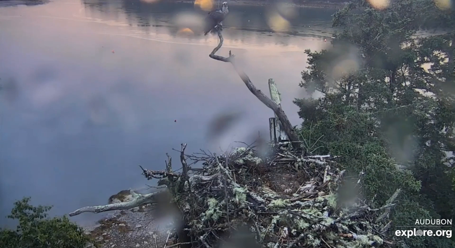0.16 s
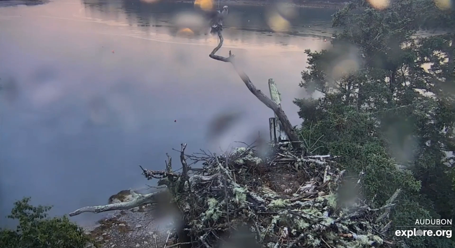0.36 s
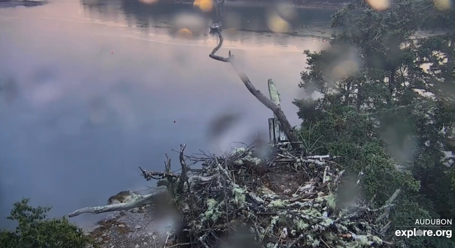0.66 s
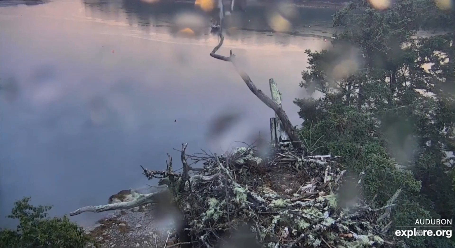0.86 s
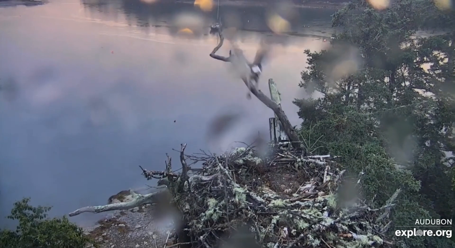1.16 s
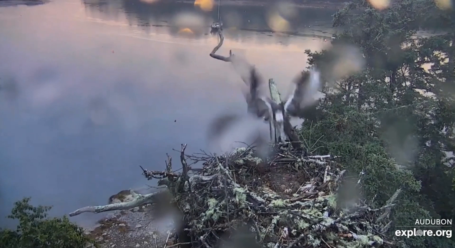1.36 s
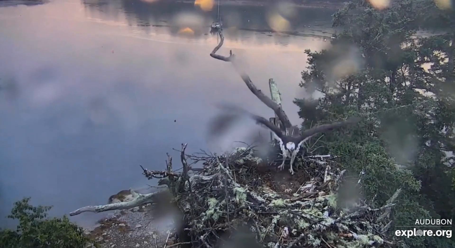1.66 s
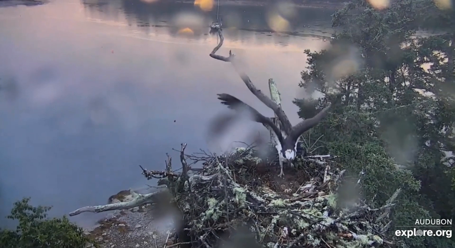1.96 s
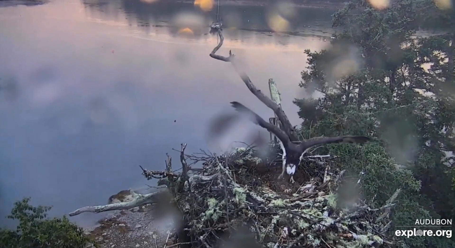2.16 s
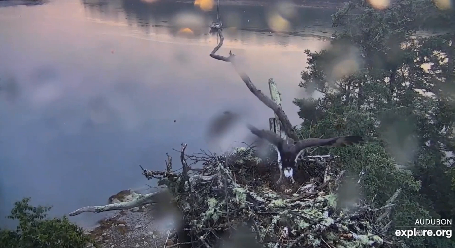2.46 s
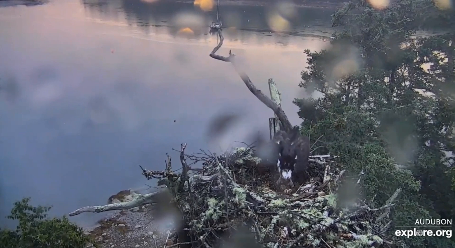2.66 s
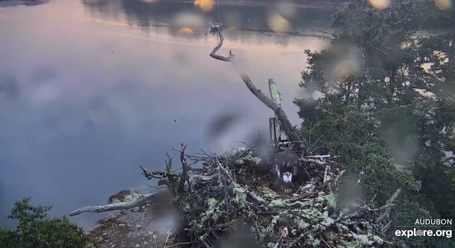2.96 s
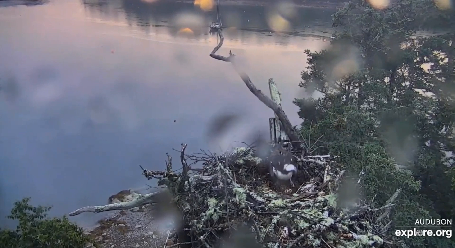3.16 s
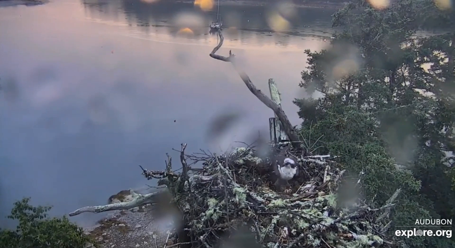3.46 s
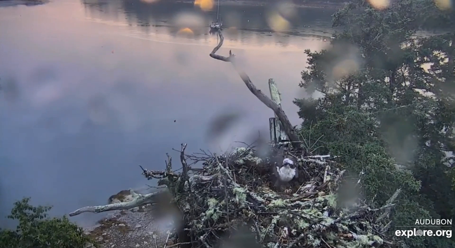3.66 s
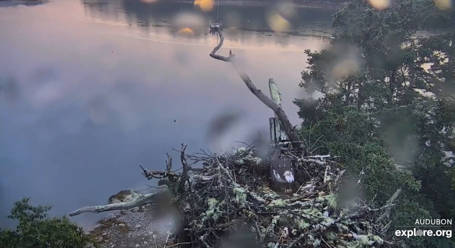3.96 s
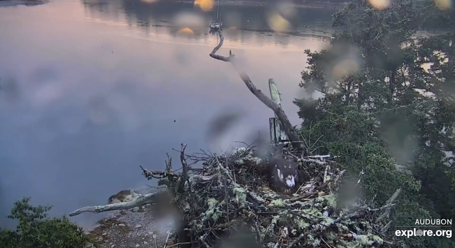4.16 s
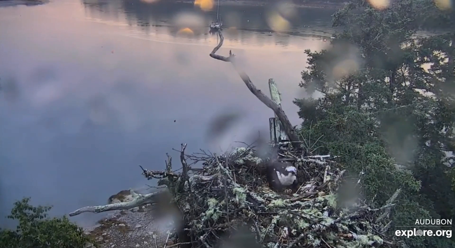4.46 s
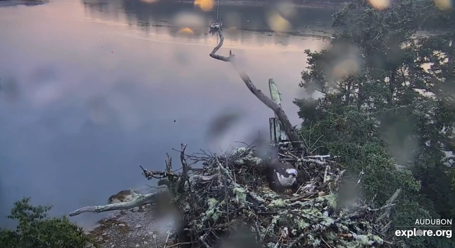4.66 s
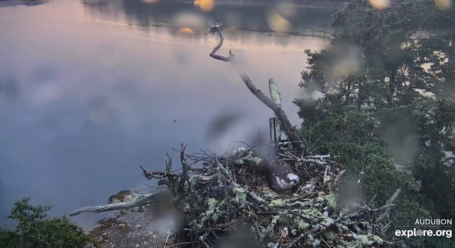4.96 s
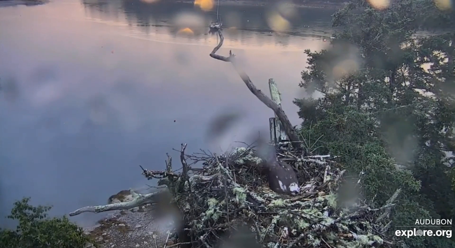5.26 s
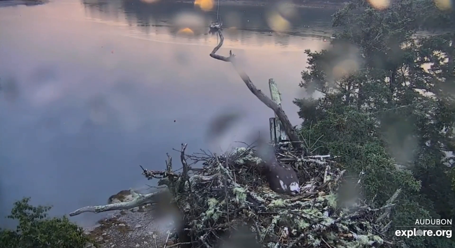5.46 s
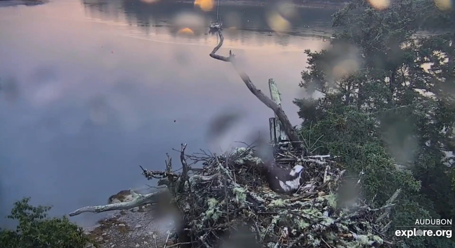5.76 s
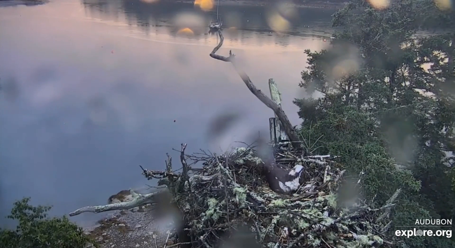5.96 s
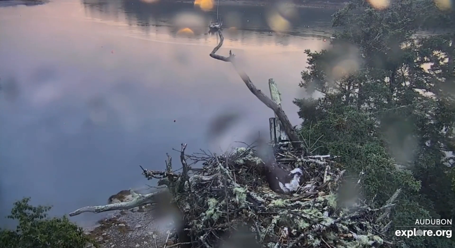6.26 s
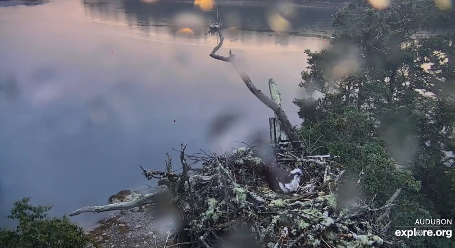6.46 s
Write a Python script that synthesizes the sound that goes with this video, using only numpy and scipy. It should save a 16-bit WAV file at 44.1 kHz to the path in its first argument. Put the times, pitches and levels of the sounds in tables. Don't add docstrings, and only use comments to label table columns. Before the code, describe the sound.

Seven tiny arched bird whistles, each a mere blip, sound over a quiet lakeside hiss with soft watery murmur. Between the second and third, feathers flutter quickly and a cluster of brittle twig cracks marks the landing. Later calls come further apart, the fifth loudest, with soft hollow drips and light leaf ticks between. The single microphone is a few metres from the nest, in open air with slight scattered tree echo and a blurred distant return.

```python
import sys
import numpy as np
from scipy import signal
from scipy.fft import rfft, irfft, next_fast_len
from scipy.io import wavfile
from scipy.ndimage import uniform_filter1d

SR = 44100
rng = np.random.default_rng(int(sys.argv[2]) if len(sys.argv) > 2 else 0)


def volts(x):
    e = np.asarray(x, float) / 20
    return 10 ** e


def int16_out(signal):
    q = np.round(np.clip(np.atleast_2d(signal).T, -1, 1) * 32767)
    wavfile.write(sys.argv[1], SR, q.astype(np.int16))


N = 291937

# frequency in Hz, level in dB per Hz.
AIR_SPECTRUM = [(20, -30.5), (32, -0.5), (48, -27), (62, -1), (120, -2.5), (200, -8), (700, -12.5),
                (1300, -10.5), (1800, -8), (2500, -20.5), (4000, -21.5), (8000, -28), (12000, -32.5),
                (15600, -33)]
AIR_DB = -66
# frequency in Hz, rms level in dB.
WHINES = [
    (15734, -93),
    (11234, -108),
    (33, -87),
]
# time in seconds, level in dB.
LAPPING = [(0.0, -61.5), (0.15, -64.5), (0.33, -67.5), (1.14, -62), (1.56, -62.5), (2.06, -66.5),
           (2.73, -63.5), (2.93, -65), (3.26, -68.5), (3.65, -66), (3.82, -63), (4.04, -66.5),
           (4.74, -65.5), (5.33, -69.5), (5.83, -63), (5.96, -67), (6.27, -63), (6.62, -70.5)]
# frequency in Hz, width in Hz, level in dB.
HOUSING = [
    (1832, 460, 0.5),
    (1605, 580, 2),
    (1200, 55, 2),
    (2264, 750, -12),
]
# start in seconds, peak in dB, pitch in Hz, 60 dB decay in seconds.
TICKS = [(0.0197, -55, 2580, 0.02), (0.3122, -56, 2690, 0.018), (3.1437, -54, 2700, 0.02),
         (3.2001, -57, 2920, 0.017), (3.7434, -58, 2357, 0.021), (4.0881, -57, 2350, 0.025),
         (5.032, -55, 2640, 0.021), (5.096, -54, 2680, 0.02)]
# start in seconds, length in seconds, peak in dB, top pitch in Hz,
# faint falling end in dB relative to the peak.
WHISTLES = [
    (0.113, 0.043, -32.5, 1963, -21.5),
    (0.893, 0.015, -37.5, 1884, -9),
    (1.534, .040, -33.5, 1962, -41),
    (2.071, 0.053, -39.5, 1994, -38),
    (3.332, 0.042, -26.5, 2018, -44),
    (4.464, 0.045, -31.5, 1942, -40),
    (5.863, 0.046, -28, 1960, -30),
]
# crest as a share of length, start and end in dB relative to the crest.
EFFORTS = [(.47, -18, -15), (.58, -29, -11), (.6, -12.5, -7.5), (.44, -16, -11), (.5, -17, -10),
           (.62, -15, -14), (.66, -15, -11.5)]
# top as a share of length, climb in % per ms, slide in % per ms,
# rounding of the top in ms.
ARCHES = [(.43, .65, .48, 8), (.5, 0.75, 0.6, 2.5), (0.33, 1, 0.69, 2.4), (0.323, 0.94, 0.62, 3.3),
          (.33, 0.86, 0.95, 13.3), (0.554, 0.54, 0.62, 2.6), (0.627, .31, 0.54, 8)]
# octave, third and fourth in dB relative to the fundamental,
# fifth in dB relative to the fourth.
PARTIALS = [(-25, -54, -42.5, -12), (-14.5, -44, -26.5, -11.5), (-11.5, -36, -25.5, -13),
            (-11, -32, -29, -22), (-15, -40, -32, -18), (-15, -39, -34.5, -12), (-26, -46.5, -45.5, -11.5)]
# trunk echo delay in seconds,
# trunk echo in dB, leaf scatter in dB.
POSTURE = [(0.0268, -20, 2), (0.02, -20, 3), (0.022, -16.5, 2), (.017, -13, -11), (0.028, -27, -9),
           (0.011, -19, -6), (.024, -31.5, -5.5)]
# time in seconds, depth in dB,
# width in seconds.
CATCHES = [(3.3645, -34, 0.0027), (.1205, -3.5, 0.0026), (.147, -8, 0.0027), (.909, -6, 0.0015),
           (2.082, -7, 0.0017), (4.481, -5, 0.0019)]
# frequency in Hz, gain in dB.
ECHO_TONE = [(1000, -25), (1600, -13), (1850, -5), (1990, 1), (2300, 0), (3500, -6), (4050, 1), (6000, -8),
             (10000, -25)]
# delay in seconds, level in dB.
LEAVES = [(.004, -34.5), (.012, -24.5), (.035, -21.5), (.07, -30.5), (.13, -34), (.2, -46.5)]
# delay in seconds, level in dB.
SHORE = [(.2, -66), (.3, -37), (.45, -39), (.62, -48), (.8, -74)]
# start in seconds, peak in dB, pitch in Hz.
DRIPS = [(0.3445, -60, 1200), (0.495, -55, 1154), (1.6646, -58, 1200), (1.743, -52.5, 1190),
         (2.4167, -48, 1160), (3.67, -59, 1110), (3.9499, -47.5, 1186), (4.2867, -62, 1150),
         (5.032, -56, 1080)]
# start in seconds, peak in dB, pitch in Hz.
KNOCK = (.7255, -48, 1600)
# centre in seconds, level in dB, half length in seconds,
# frequency in Hz, width in Hz.
BUMPS = [
    (0.439, -70, 0.029, 230, 117),
    (0.483, -59.5, 0.03, 300, 248),
    (0.57, -66.5, 0.018, 208, 100),
    (2.329, -65, 0.0094, 430, 150),
    (6.188, -68.5, 0.016, 2570, 350),
]
# centre in seconds, level in dB, half length in seconds.
WINGS = [(0.94, -72, 0.026), (1.011, -60.5, 0.018), (1.135, -56.5, 0.02), (1.235, -58, 0.0096),
         (1.26, -59, 0.014), (1.31, -64, 0.013), (1.361, -56.5, 0.021), (1.42, -69, 0.013),
         (2.43, -59.5, 0.0034)]
# frequency in Hz, level in dB per Hz.
FEATHERS = [(180, -51), (300, -22), (384, -12.5), (1380, -4.5), (1640, 3), (2520, -13.5), (4540, -16),
            (5810, -29), (7440, -17), (12000, -40), (15600, -73), (22000, -120)]
# start in seconds, peak in dB, burst length in seconds, tilt in dB per octave.
SNAPS = [(1.253, -45, .002, -1), (1.3447, -32, .005, 3), (1.349, -39, .003, 2), (1.357, -46, .002, 3),
         (1.3605, -33, .0035, -1), (1.370, -50, .005, .5), (1.380, -50, .003, 3), (1.384, -37.5, .002, -4),
         (1.386, -42, .002, -5), (5.2655, -52, .001, 0)]
# frequency in Hz, level in dB per Hz.
TWIG = [(180, -61), (300, -31), (507, -25), (680, -22), (818, -16.5), (1520, -3), (2560, -15), (2770, -19),
        (3380, -36), (7790, -39), (12000, -51), (15600, -79), (22000, -120)]
# centre in seconds, length in seconds, lower edge in Hz,
# upper edge in Hz, depth in dB.
DROPOUTS = [(1.002, .036, 2900, 3950, -35), (1.002, .036, 4950, 15300, -30), (1.002, .034, 700, 900, -20),
            (4.541, .014, 2400, 3700, -10), (4.541, .015, 4300, 15300, -16)]
# centre in seconds, length in seconds,
# frequency in Hz, level in dB.
SPARED_LINES = [(.997, 0.047, 7400, -80), (4.541, .02, 9200, -86)]

ATTACK_S, RELEASE_S, TRAIL_S, TRAIL_FADE_S = 0.007, 0.0048, 0.018, 0.018
SWELL_POWER, SAG_POWER = 2.07, 2.3
START_DROP_PERCENT, LOWEST_HZ = 11, 1612
CLIMB_LOSS_DB = 1.7
OCTAVE_LOSS_DB, FOURTH_LOSS_DB = 1, 0.3
CLOSING = 0.081


def evened(x):
    return x / np.sqrt(np.mean(x ** 2) + 1e-20)


def curve(rows, t):
    return np.interp(t, *np.transpose(rows))


def add(mix, s, sound):
    part = mix[round(s * SR):][:len(sound)]
    part += sound[:len(part)]


def coloured(x, points):
    hz, db = np.transpose(points)
    size = next_fast_len(len(x) + 512)
    bins = np.fft.rfftfreq(size, 1 / SR)
    gain = volts(np.interp(np.log(bins + 1), np.log(hz + 1), db))
    return irfft(rfft(x, size) * gain, size)[:len(x)]


def resonate(x, hz, width):
    return signal.lfilter(*signal.iirpeak(hz, hz / width, SR), x)


def drift(count, size):
    once = uniform_filter1d(rng.standard_normal(count), size)
    return evened(uniform_filter1d(once, size))


def swell(s, half):
    return np.exp(-((np.arange(N) / SR - s) / half) ** 2)


def gate(t, width):
    return np.sin(np.pi / 2 * np.clip(t / width + 0.5, 0, 1)) ** 2


def ring(db, hz, t60, rise):
    t = np.arange(round(t60 * SR)) / SR
    return volts(db - 60 * t / t60) * np.minimum(t / rise, 1) * np.sin(2 * np.pi * hz * t)


def air():
    _, _, z = signal.stft(coloured(rng.standard_normal(N), AIR_SPECTRUM), SR, nperseg=1024)
    patches = uniform_filter1d(rng.standard_normal(z.shape), size=12, axis=0)
    patches_db = evened(uniform_filter1d(patches, size=4, axis=1))
    hiss = signal.istft(z * volts(patches_db), SR, nperseg=1024)[1][:N]
    return volts(AIR_DB) * evened(hiss)


def whines():
    t, out = np.arange(N) / SR, np.zeros(N)
    for hz, db in WHINES:
        phase = 2 * np.pi * hz * t + 0.9 * drift(N, size=900)
        out += np.sqrt(2) * volts(db) * np.sin(phase)
    return out


def lake():
    size = volts(2.5 * np.minimum(rng.exponential(1, N), 3))
    struck = rng.random(N) < 2500 / SR
    drops = size * struck * rng.standard_normal(N)
    splash = np.zeros(N)
    for hz, width, db in HOUSING:
        patches = volts(db + 3 * drift(N, size=3000))
        splash += patches * resonate(resonate(drops, hz, width), hz, width)
    return volts(curve(LAPPING, np.arange(N) / SR) - 3.5) * evened(splash)


def leaf_ticks():
    out = np.zeros(N)
    for s, db, hz, t60 in TICKS:
        for ratio in (1, 1.12, 1.4):
            add(out, s, ring(db - 9 * ratio + 5, hz * ratio, t60 / ratio ** 2, rise=0.001))
    return out


def flatness(t, length, top, climb, slide, round_ms):
    ms = 1000 * (t - top * length)
    away = np.sqrt(ms ** 2 + round_ms ** 2) - round_ms
    climbing = START_DROP_PERCENT * np.tanh(climb * away / START_DROP_PERCENT)
    return np.where(ms < 0, climbing, slide * away)


def breath(t, length, trail_db, crest, start_db, end_db):
    u = np.clip(t / length, 0, 1) - crest
    swelling_db = start_db * abs(u / crest) ** SWELL_POWER
    sagging_db = end_db * abs(u / (1 - crest)) ** SAG_POWER
    body = volts(np.where(u < 0, swelling_db, sagging_db)) * gate(length - t, RELEASE_S)
    trail = volts(trail_db) * gate(length + TRAIL_S - t, TRAIL_FADE_S)
    return gate(t, ATTACK_S) * np.sqrt(body ** 2 + trail ** 2)


def comb_catches(t):
    gain = np.ones(len(t))
    for at, depth_db, width in CATCHES:
        gain *= 1 - (1 - volts(depth_db)) / (1 + ((t - at) / width) ** 2)
    return gain


def whistle(row, effort, arch, partials):
    start, length, db, top_hz, trail_db = row
    octave_db, third_db, fourth_db, fifth_db = partials
    t = np.arange(-0.005, 0.09, 1 / SR)
    flat = flatness(t, length, *arch)
    hz = np.maximum(top_hz * (1 - flat / 100), LOWEST_HZ)
    turn = 2 * np.pi * np.cumsum(hz) / SR

    shut_db = CLIMB_LOSS_DB * flat * (t < arch[0] * length)
    flat = flat * (1 + CLOSING * flat)
    octave = volts(octave_db - OCTAVE_LOSS_DB * flat)
    third = volts(third_db - 0.5 * OCTAVE_LOSS_DB * flat - shut_db)
    fourth = volts(fourth_db - FOURTH_LOSS_DB * flat - shut_db)
    fifth = fourth * volts(fifth_db)

    flutter = [volts(depth_db * drift(4400, size=90)[:len(t)]) for depth_db in (0.2, 1.5, 3, 2.5, 3.5)]
    tone = flutter[0] * comb_catches(t + start) * np.sin(turn)
    tone += flutter[1] * octave * np.cos(2 * turn)
    tone += flutter[2] * third * np.sin(3 * turn)
    tone += flutter[3] * fourth * np.cos(4 * turn)
    tone += flutter[4] * fifth * np.sin(5 * turn)
    return start + t[0], np.sqrt(2) * volts(db) * tone * breath(t, length, trail_db, *effort)


def scatter(x, rows, per_s):
    t = np.arange(round(rows[-1][0] * SR)) / SR
    strength, chance = rng.standard_normal((2, SR))[:, :len(t)]
    present = (abs(chance) < per_s / SR) * (t > rows[0][0])
    taps = strength * present * volts(curve(rows, t))
    return signal.fftconvolve(x, taps / np.sqrt(0.04 * per_s))


def bird():
    direct, near = np.zeros((2, N))
    for *shape, (delay, echo_db, scatter_db) in zip(WHISTLES, EFFORTS, ARCHES, PARTIALS, POSTURE):
        s, call = whistle(*shape)
        add(direct, s, call)
        add(near, s + delay, volts(echo_db) * call)
        add(near, s, volts(scatter_db) * scatter(call, LEAVES, 1500))
    far = resonate(scatter(direct, SHORE, 2300)[:N], 1530, 460)
    return direct + coloured(near, ECHO_TONE) + far


def drips():
    out = np.zeros(N)
    for s, db, hz in DRIPS + [KNOCK]:
        add(out, s, ring(db - 1, hz, 0.05, rise=0.003))
    return out


def bumps():
    out, noise = np.zeros(N), rng.standard_normal(N)
    for s, db, half, hz, width in BUMPS:
        rumble = evened(resonate(resonate(noise, hz, width), hz, width))
        out += volts(db) * swell(s, half) * rumble
    return out


def wings():
    grain_db = 2.2 * evened(uniform_filter1d(rng.standard_normal(N), size=130))
    grain = volts(np.clip(grain_db, -4, 3.5))
    rustle = evened(coloured(grain * rng.standard_normal(N), FEATHERS))
    return rustle * sum(volts(db) * swell(s, half) for s, db, half in WINGS)


def twig_snaps():
    out, t = np.zeros(N), np.arange(600) / SR
    noises = rng.standard_normal((len(SNAPS), 600))
    for (s, db, length, tilt), noise in zip(SNAPS, noises):
        twig = [(hz, level + tilt * np.log2(min(hz, 1500) / 1500)) for hz, level in TWIG]
        burst = noise * np.minimum(t / 0.0007, 1) * np.exp(-(t / length) ** 2)
        burst = coloured(np.r_[np.zeros(100), burst], twig)
        add(out, s - 100 / SR, volts(db) * burst / abs(burst).max())
    return out


def scene():
    mix = bird() + air() + whines() + lake() + wings()
    mix += twig_snaps() + drips() + leaf_ticks() + bumps()
    return mix[None]


def band_limit(x):
    return signal.sosfilt(signal.butter(12, 15800, fs=SR, output="sos"), x)


def record(dry):
    t, x = np.arange(N) / SR, dry[0]
    for s, length, low_hz, high_hz, depth_db in DROPOUTS:
        bandpass = signal.butter(4, [low_hz, high_hz], "band", fs=SR, output="sos")
        band = signal.sosfiltfilt(bandpass, x)
        moment = np.exp(-(2 * (t - s) / length) ** 8)
        x = x - (1 - volts(depth_db)) * moment * band
    for s, length, hz, db in SPARED_LINES:
        x = x + volts(db) * swell(s, length / 2) * np.sin(2 * np.pi * hz * t)
    lowpass = signal.firwin(2047, 15800, window=("kaiser", 7), fs=SR)
    x = signal.oaconvolve(x, lowpass, "same")
    return band_limit(x[None])


dry = scene()
out = record(dry)
int16_out(out)
```